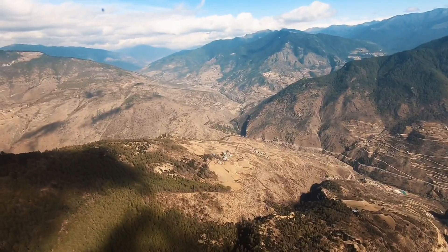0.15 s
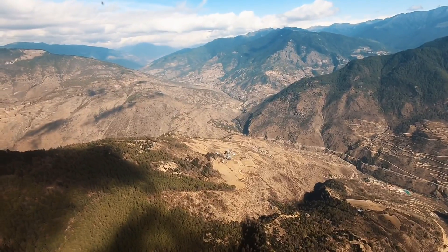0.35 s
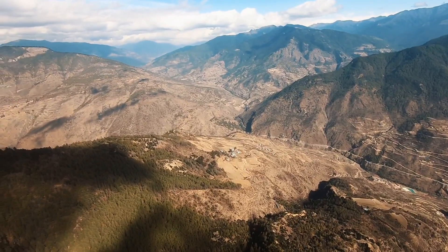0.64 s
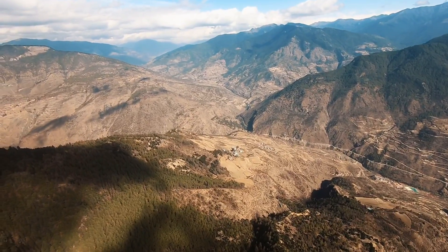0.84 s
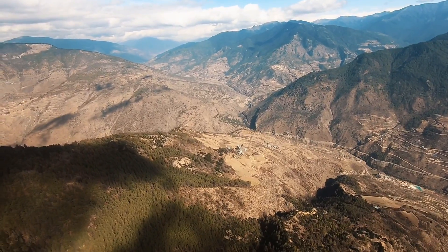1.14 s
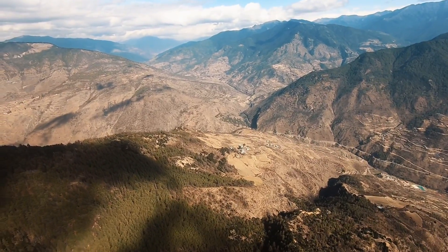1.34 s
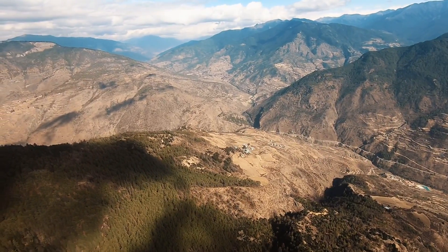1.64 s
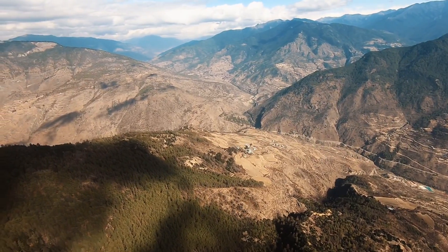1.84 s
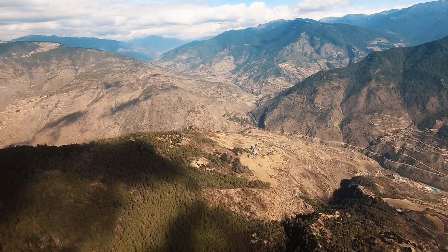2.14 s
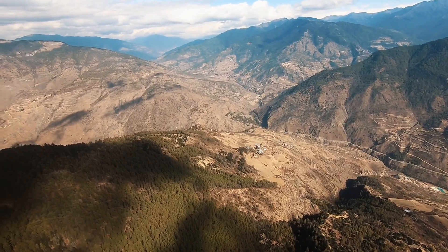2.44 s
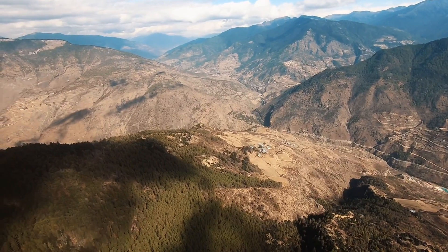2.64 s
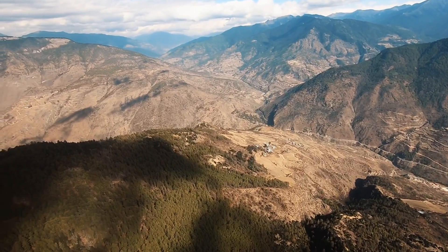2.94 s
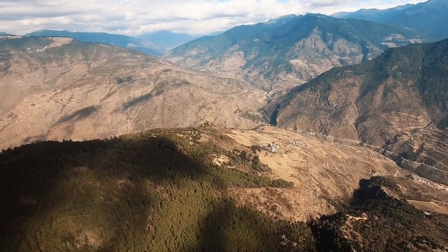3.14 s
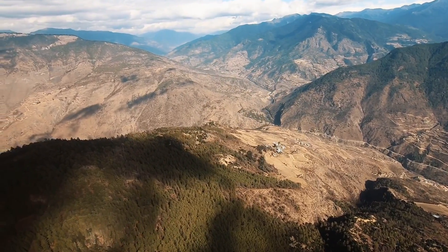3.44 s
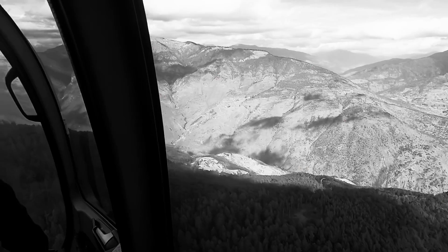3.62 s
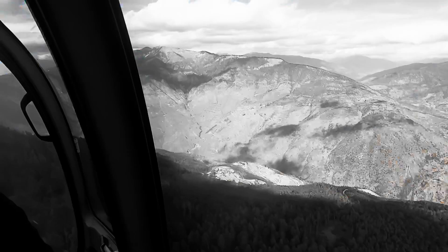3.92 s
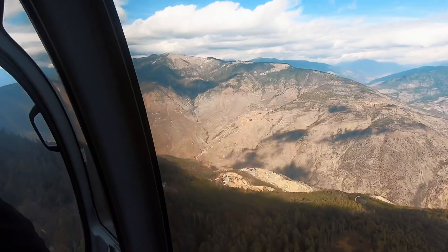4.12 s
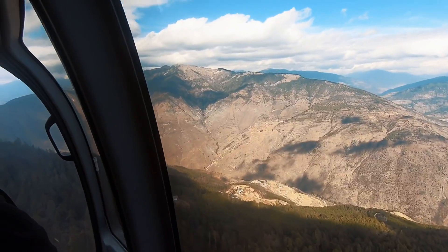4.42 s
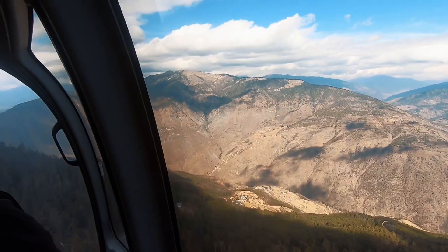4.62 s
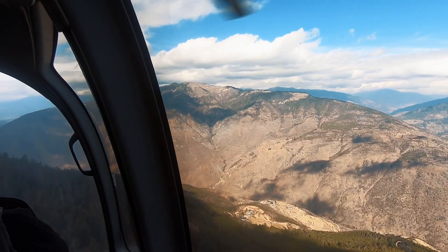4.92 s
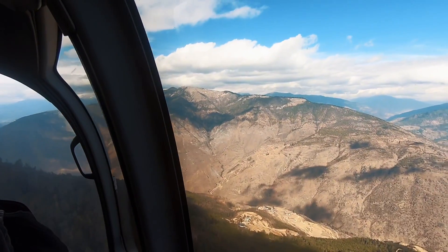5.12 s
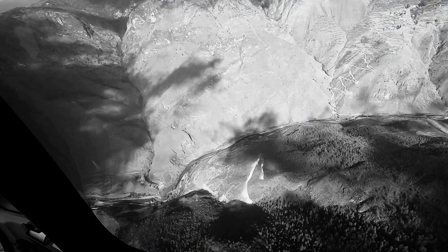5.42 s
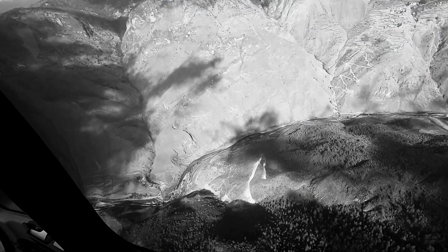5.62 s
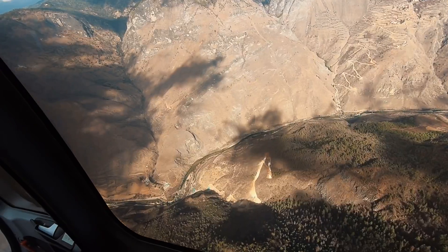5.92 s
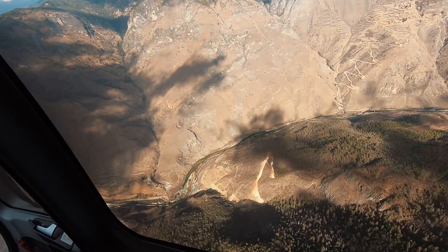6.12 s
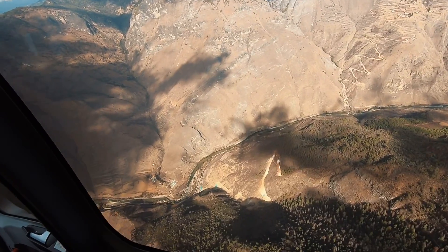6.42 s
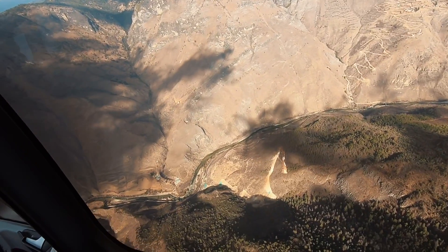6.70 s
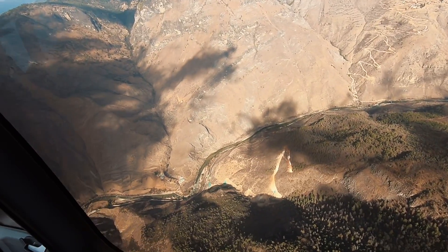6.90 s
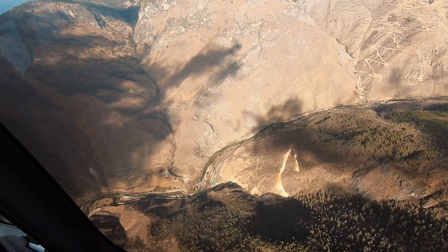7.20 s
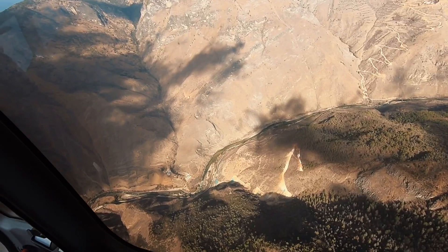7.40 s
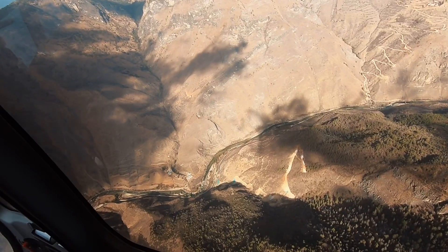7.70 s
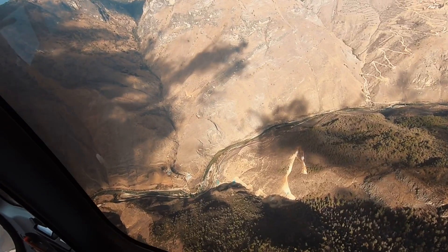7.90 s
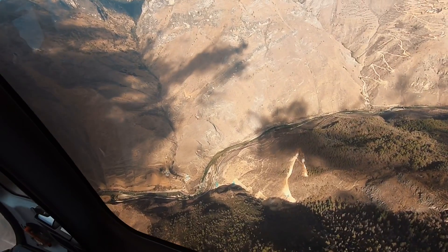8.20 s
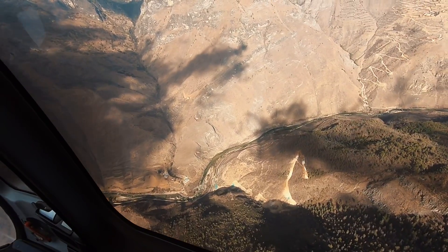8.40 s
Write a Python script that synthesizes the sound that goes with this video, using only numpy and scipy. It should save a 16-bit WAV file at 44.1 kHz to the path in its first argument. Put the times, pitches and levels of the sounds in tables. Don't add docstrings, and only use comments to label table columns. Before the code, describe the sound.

Inside a light helicopter in flight: deep fast rotor thump over heavy low air rumble, faint gear whine and thin hiss, with two abrupt scene changes.

```python
import sys
import numpy as np
from scipy import signal
from scipy.io import wavfile
from scipy.ndimage import uniform_filter1d, minimum_filter1d, map_coordinates

SR = 44100
rng = np.random.default_rng(int(sys.argv[2]) if len(sys.argv) > 2 else 0)


def voltage_ratio(decibels):
    exponent = np.asarray(decibels, float) / 20
    return 10 ** exponent


def wav_record(signal):
    frames = np.transpose(np.atleast_2d(signal))
    bounded = np.clip(frames, -1, 1)
    quanta = np.round(bounded * 32767).astype(np.int16)
    wavfile.write(sys.argv[1], SR, quanta)


N = 377099

# (start [s], blade rate [1/s], first pass after start [s], third-order lag [turns], pressure at its end [1])
MOMENTS = [
    (0, 19.696, .0355, .25, -.21),
    (3.43569, 19.684, .0056, .2, .13),
    (5.40357, 19.71, .0072, .08, -.27),
]
# (multiple of blade rate [1], level in moments 1, 2, 3 [dB] x3)
STEADY_ORDERS = [(1, -25.5, -27, -28), (5, -55, -37, -46.5), (6, -36.5, -35, -30.5), (7, -31.5, -41, -39.5),
                 (8, -43.5, -45, -47)]
# (multiple of blade rate [1], level in moments 1, 2, 3 [dB] x3, gain per sway [dB/dB])
SWAYING_ORDERS = [(2, -17, -20.5, -18.5, .7), (3, -23, -22, -21, -1.2), (4, -24.5, -29, -32, 0.85)]
FOURTH_FADE_DB_PER_S = [0, -5, -4]
# (time [s], sway [dB])
SWAY_DB = [
    [(0, -4), (.5, 0.3), (1.03, 1.5), (1.4, 0.7), (2.06, -.6), (2.4, 2), (3.44, -1.5)],
    [(3.44, 3.5), (4.05, 0.5), (4.42, 3.2), (5.0, -4.5), (5.4, -2)],
    [(5.4, 0), (5.75, 2.5), (7.15, -1.5), (7.5, 2.5), (7.9, -2), (8.55, 4)],
]
TAIL_SHAFT_RATIO, TAIL_DB = 5.185, [-34, -30.5, -41]

# (frequency [Hz], density [dB/Hz])
BUFFET_DB_PER_HZ = [
    [(14, -59.5), (28, -41.5), (70, -40.5), (95, -41), (130, -40), (170, -42.5), (215, -43), (260, -51.5),
     (300, -52.5), (330, -58.5), (365, -64), (450, -67), (600, -74), (800, -100)],
    [(14, -53.5), (28, -47), (70, -39), (95, -37.5), (130, -38.5), (170, -41.5), (215, -45), (260, -48.5),
     (300, -48.5), (330, -58), (365, -63.5), (450, -67), (600, -77.5), (800, -100)],
    [(14, -59.5), (28, -48), (70, -37.5), (95, -41.5), (130, -37.5), (170, -42.5), (215, -44), (260, -46),
     (300, -49.5), (330, -52.5), (365, -61.5), (450, -64), (600, -72), (800, -100)],
]
# (frequency [Hz], density [dB/Hz])
SEAL_DB_PER_HZ = [(200, -75.5), (280, -52.5), (328, -52.5), (352, -67.5), (480, -80)]
# (level at mid-moment [dB], slope [dB/s])
SEAL_RISE = [
    (-5.5, 3.5),
    (-2, .6),
    (-1.2, 0.76),
]
# (frequency [Hz], density [dB/Hz])
ROAR_DB_PER_HZ = [
    [(380, -86), (600, -73.5), (680, -68.5), (740, -64.5), (820, -65), (920, -69), (1050, -67.5),
     (1150, -74.5), (1280, -77.5), (1400, -77), (1600, -78), (1800, -77.5), (1950, -81), (2400, -100)],
    [(380, -86), (600, -68.5), (680, -61.5), (740, -61.5), (820, -66.5), (920, -71.5), (1050, -73.5),
     (1150, -75.5), (1280, -71.5), (1400, -78.6), (1600, -80.5), (1800, -79.5), (1950, -80), (2400, -100)],
    [(380, -88.5), (600, -72), (680, -66), (740, -63), (820, -63), (920, -69), (1050, -70.5), (1150, -73.5),
     (1280, -77.5), (1400, -75.5), (1600, -76), (1800, -76), (1950, -79.5), (2400, -100)],
]
# (frequency [Hz], width [Hz], lift in moments 1, 2, 3 [dB] x3)
PANEL_MODES = [(690, 35, 0, 3, 0), (714, 30, 1.5, 0, 4), (745, 30, 1.5, 2.5, 0), (815, 35, 3.5, 0, 2.5),
               (885, 40, 0, 0, 3), (1250, 45, 0, 3, 0), (1314, 40, 3.5, 1.5, 0), (1660, 35, 0, 0, 3)]

MESH_RATIOS = [88.12, 100, 400 / 3, 500 / 3]
# (level in moments 1, 2, 3 [dB] x3, gain per torque [dB/dB])
MESH_LEVELS = [(-58, -55.5, -55.5, 1), (-69.5, -68, -69, .7), (-71, -71, -77, .1), (-68.8, -63.3, -76, .5)]
# (share at mid-moment [1], slope [1/s])
SHAFT_SLIP = [(0, 0), (.001, .0006), (0, 0)]
# (time [s], torque [dB])
TORQUE_DB = [
    [(0, -1), (.9, 1.3), (1.5, -1.7), (2.06, 1.3), (2.4, -1.5), (3.44, 0)],
    [(3.44, -12), (3.8, -8), (4.15, -1), (4.8, 3), (5.4, 2)],
    [(5.4, -2), (6.0, 0), (6.8, -2.5), (7.4, 3.5), (7.9, 2.5), (8.55, -2.5)],
]

# (frequency [Hz], density [dB/Hz])
HISS_DB_PER_HZ = [
    [(1800, -105), (2150, -88.5), (2500, -89.5), (2850, -89.5), (3150, -90), (3450, -93), (4000, -94),
     (4550, -94), (5000, -94), (5300, -94), (5700, -99.3), (6000, -101.8), (6500, -104.1), (7500, -125)],
    [(1800, -105), (2150, -91), (2500, -88), (2850, -89.5), (3150, -88), (3450, -93), (4000, -92.5),
     (4550, -93), (5000, -95), (5300, -95.0), (5700, -95.5), (6000, -101.8), (6500, -104.2), (7500, -125)],
    [(1800, -105), (2150, -89), (2500, -87.5), (2850, -90.5), (3150, -89), (3450, -93), (4000, -92),
     (4550, -93.5), (5000, -94.0), (5300, -95), (5700, -95.5), (6000, -102.5), (6500, -105.2), (7500, -125)],
]
# (frequency [Hz], density [dB/Hz])
FIZZ_DB_PER_HZ = [(6000, -120), (7000, -110.3), (7300, -111.5), (8000, -113.6), (9000, -113.2),
                  (9500, -116.9), (9900, -120.5), (11200, -120.8), (11800, -109.8), (12300, -104.6),
                  (13200, -107.2), (14100, -107.3), (14900, -112.6), (15650, -114.5)]
# (frequency [Hz], width [Hz], lift in moments 1, 2, 3 [dB] x3)
DUCT_MODES = [(2350, 30, 0, 6, 0), (2488, 20, 0, 6, 0), (3075, 60, 2.5, 2.6, 1.5), (3312, 50, 0, 7, 0),
              (3848, 40, 3, 5.5, 2.5), (4295, 50, 5, 7, 5), (4338, 35, 5, 3, 6), (4690, 70, 0, 4.5, 0),
              (4890, 35, 0, 4.5, 0), (4972, 45, 5, 3, 0), (5508, 55, 4, 6, 5.5), (7530, 40, 6, 0, 0),
              (12450, 100, 2.3, 2.3, .8)]

TICK_DB = [-60, -57.5, -59.7]
# (time [s], peak [dB])
STRAY_TICKS = [
    (2.6773, -65),
    (7.3522, -65),
]
# (time [s], peak [dB])
RATTLES = [
    (6.296, -62),
    (6.397, -60),
    (8.222, -58),
    (8.274, -62),
    (8.305, -58),
    (8.526, -59),
]

GUSTS_PER_S = 3
BUFFET_GUST_DB, ROAR_GUST_DB, HISS_GUST_DB = -0.07, -0.03, 0.1
ROAR_DB_PER_DB, HISS_DB_PER_DB, SEAL_DB_PER_DB = [.1, .08, 0.32], .04, 0.64


def evened(x):
    return x / np.sqrt(np.mean(x ** 2))


def spectrum_db(points, hz):
    f, db = np.transpose(points)
    return np.interp(np.log(hz + 1), np.log(f + 1), db, left=-200, right=-200)


def lift_db(modes, m, hz):
    return sum(row[m + 2] / (1 + (2 * (hz - row[0]) / row[1]) ** 2) for row in modes)


def follow(points, t):
    return np.interp(t, *np.transpose(points))


def drift(n, per_s):
    knots = rng.standard_normal(int(n / SR * per_s) + 4)
    return map_coordinates(knots, [np.arange(n) / SR * per_s], order=3)


def air(t, shape_db, size, level_db, patchy_db, flicker_db):
    overlap = size * 3 // 4
    hz, when, z = signal.stft(rng.standard_normal(len(t)), SR, nperseg=size, noverlap=overlap)
    patches = uniform_filter1d(rng.standard_normal(z.shape), size=8, axis=0)
    patches = evened(uniform_filter1d(patches, size=8, axis=1))
    flicker = evened(uniform_filter1d(rng.standard_normal(len(when)), size=3))
    db = shape_db(hz)[:, None] + patchy_db * patches + flicker_db * flicker
    db = db + np.interp(when + t[0], t, level_db)
    noise = signal.istft(z * voltage_ratio(db), SR, nperseg=size, noverlap=overlap)[1]
    return np.sqrt(SR / 2) * noise[:len(t)]


def clicks(events, ring_hz, ring_ms):
    t, out = np.arange(-100, 100) / SR, np.zeros(N + 200)
    burst = np.exp(-(t * 1000 / ring_ms) ** 2) * np.cos(2 * np.pi * ring_hz * t)
    for s, db in events:
        out[round(s * SR):][:200] += voltage_ratio(db) * burst
    return out[60:N + 60]


def rotor(m, t):
    start_s, rate_hz, first_s, lag_turns, _ = MOMENTS[m]
    turns = rate_hz * (t - start_s - first_s) + 0.0051 * drift(len(t), 2.5)
    sway_db = follow(SWAY_DB[m], t)
    fade_db = FOURTH_FADE_DB_PER_S[m] * (t - t.mean())
    thump = 0
    for order, *levels_db, db_per_sway in SWAYING_ORDERS:
        db = levels_db[m] + db_per_sway * sway_db + fade_db * (order == 4)
        thump = thump + voltage_ratio(db) * np.sin(2 * np.pi * (order * turns - lag_turns * (order == 3)))
    for order, *levels_db in STEADY_ORDERS:
        thump = thump + voltage_ratio(levels_db[m]) * np.sin(2 * np.pi * order * turns)
    tail_db = TAIL_DB[m] + 1.2 * drift(len(t), 2.7)
    tail = voltage_ratio(tail_db) * np.sin(2 * np.pi * TAIL_SHAFT_RATIO * turns)
    return np.sqrt(2) * (thump + tail)


def buffet(m, t, gust):
    return air(t, lambda hz: spectrum_db(BUFFET_DB_PER_HZ[m], hz), size=4096,
               level_db=BUFFET_GUST_DB * gust, patchy_db=0.83, flicker_db=-0.55)


def door_seal(m, t, torque_db):
    mid_db, rise_db_per_s = SEAL_RISE[m]
    level_db = mid_db + rise_db_per_s * (t - t.mean()) + SEAL_DB_PER_DB * torque_db
    return air(t, lambda hz: spectrum_db(SEAL_DB_PER_HZ, hz), size=2048,
               level_db=level_db, patchy_db=1.0, flicker_db=0.15)


def panel_roar(m, t, gust, torque_db):
    level_db = ROAR_GUST_DB * gust + ROAR_DB_PER_DB[m] * torque_db
    return air(t, lambda hz: spectrum_db(ROAR_DB_PER_HZ[m], hz) + lift_db(PANEL_MODES, m, hz), size=2048,
               level_db=level_db, patchy_db=0.7, flicker_db=-0.02)


def gears(m, t):
    out, (slip, slip_per_s), since_mid = 0, SHAFT_SLIP[m], t - t.mean()
    passes = MOMENTS[m][1] * since_mid * (1 + slip + slip_per_s * since_mid / 2)
    for ratio, (*levels_db, db_per_torque) in zip(MESH_RATIOS, MESH_LEVELS):
        turns = ratio * passes + .07 * drift(len(t), 6)
        db = levels_db[m] + db_per_torque * follow(TORQUE_DB[m], t)
        db = db + 1.3 * drift(len(t), 3) + 1.6 * drift(len(t), 14)
        out = out + voltage_ratio(db) * np.sin(2 * np.pi * turns)
    return np.sqrt(2) * out


def turbine_db(m, hz):
    hiss, fizz = voltage_ratio(spectrum_db(HISS_DB_PER_HZ[m], hz)), voltage_ratio(spectrum_db(FIZZ_DB_PER_HZ, hz))
    return 20 * np.log10(np.hypot(hiss, fizz)) + lift_db(DUCT_MODES, m, hz)


def turbine(m, t, gust, torque_db):
    level_db = HISS_GUST_DB * gust + HISS_DB_PER_DB * torque_db
    return air(t, lambda hz: turbine_db(m, hz), size=2048, level_db=level_db, patchy_db=1.2, flicker_db=.25)


def clock_ticks():
    first_s, every_s = .9757, .98419
    times_s = np.arange(first_s, N / SR, every_s)
    where = np.searchsorted([row[0] for row in MOMENTS], times_s) - 1
    events = list(zip(times_s, np.take(TICK_DB, where))) + list(STRAY_TICKS)
    return 1.7 * clicks(events, ring_hz=9000, ring_ms=.25)


def rattles():
    return clicks(RATTLES, ring_hz=12800, ring_ms=.6)


def moment(m, t):
    gust, torque_db = drift(len(t), GUSTS_PER_S), follow(TORQUE_DB[m], t)
    torque_db = torque_db - torque_db.mean()
    noise = buffet(m, t, gust) + door_seal(m, t, torque_db) + panel_roar(m, t, gust, torque_db)
    return rotor(m, t) + noise + gears(m, t) + turbine(m, t, gust, torque_db)


def scene():
    edges = [round(row[0] * SR) for row in MOMENTS] + [N]
    mix = np.concatenate([moment(m, np.arange(edges[m], edges[m + 1]) / SR) for m in range(3)])
    return (mix + clock_ticks() + rattles())[None]


def splice(x):
    out = x * 1
    ends_s = [row[0] for row in MOMENTS[1:]] + [N / SR]
    for (*_, pressure), end_s in zip(MOMENTS, ends_s):
        end = round(end_s * SR)
        since_s = (np.arange(N) - end) / SR
        lean = np.exp(np.minimum(since_s, 0) / .005) * (pressure - x[end - 1])
        drop = pressure * np.clip(.6 - since_s / .000045, 0, 1)
        fade_in = np.clip(since_s / 0.013, 0, 1)
        out = np.where(since_s < 0, out + lean, drop + out * fade_in)
    return out


def limit(x, knee, firmness, size):
    need = minimum_filter1d(np.minimum(1, knee / (abs(x) + 1e-9)) ** firmness, size=size)
    window = np.hanning(size)
    return x * signal.oaconvolve(need - 1, window / window.sum(), "same") + x


def top_cut(x):
    return signal.sosfilt(signal.butter(12, 15730, fs=SR, output="sos"), x)


def record(dry):
    limited = limit(splice(dry[0]), knee=0.48, firmness=.75, size=901)
    bias = -.0047
    return top_cut((limited + bias)[None])


dry = scene()
out = record(dry)
wav_record(out)
```